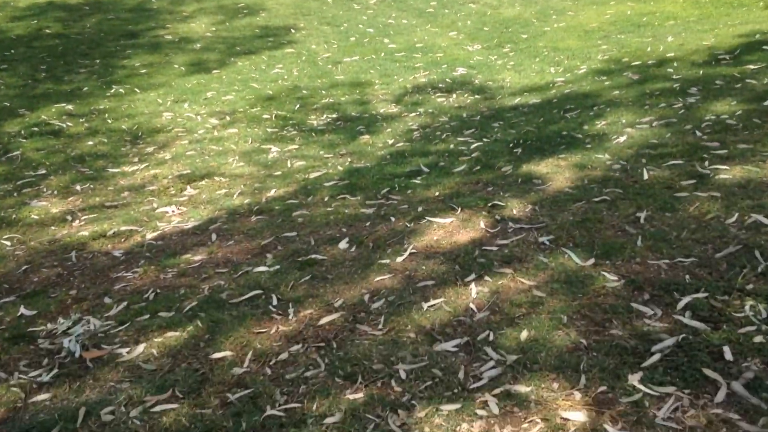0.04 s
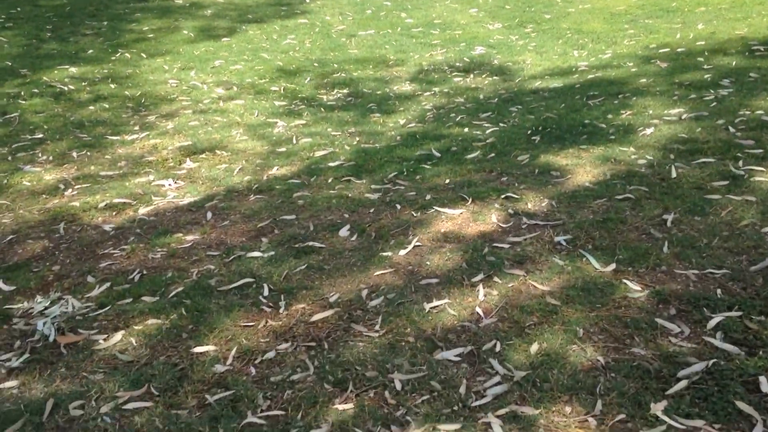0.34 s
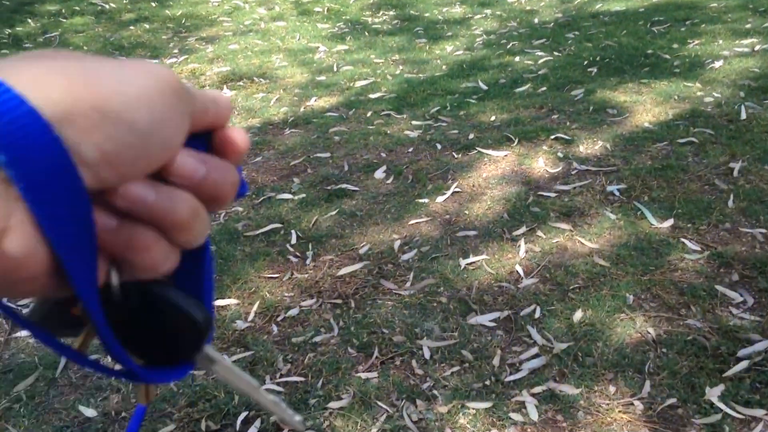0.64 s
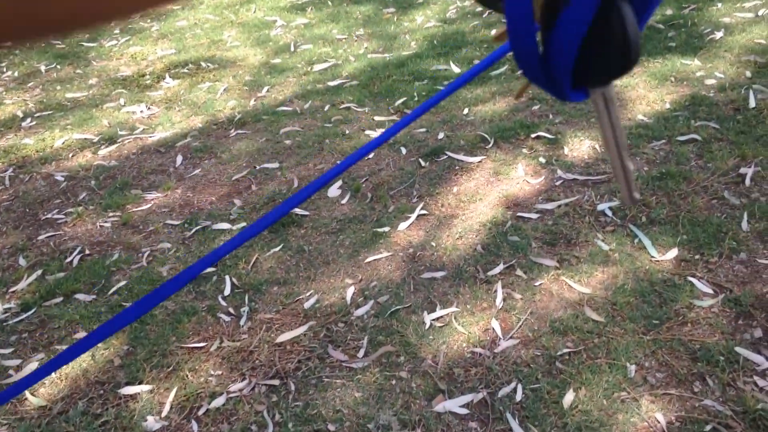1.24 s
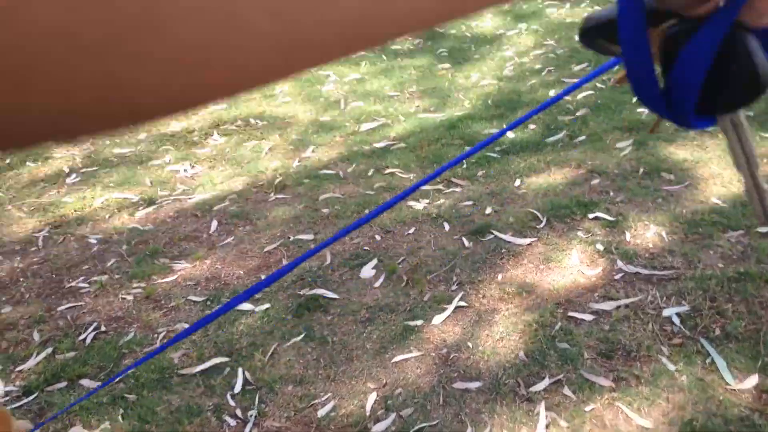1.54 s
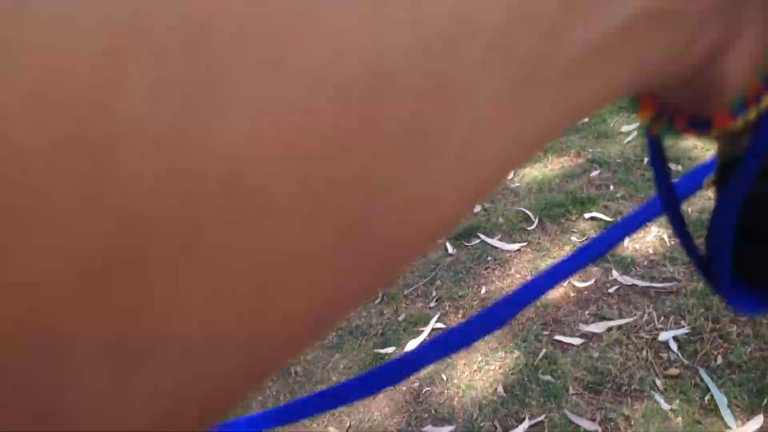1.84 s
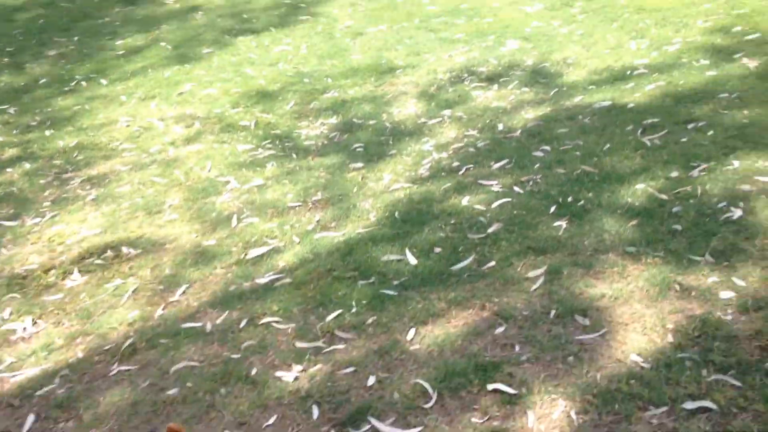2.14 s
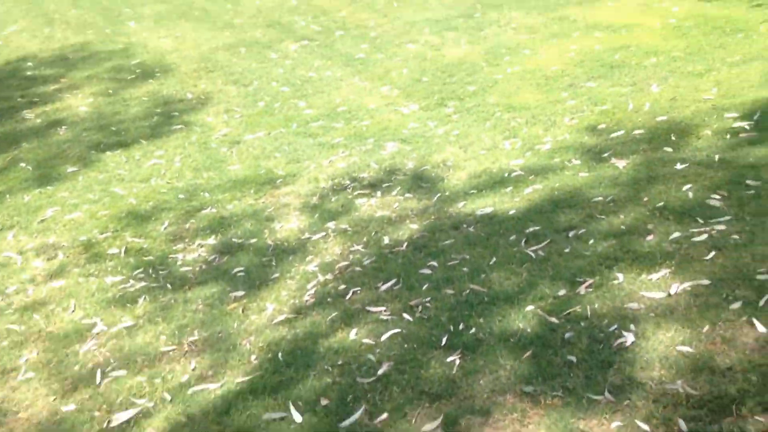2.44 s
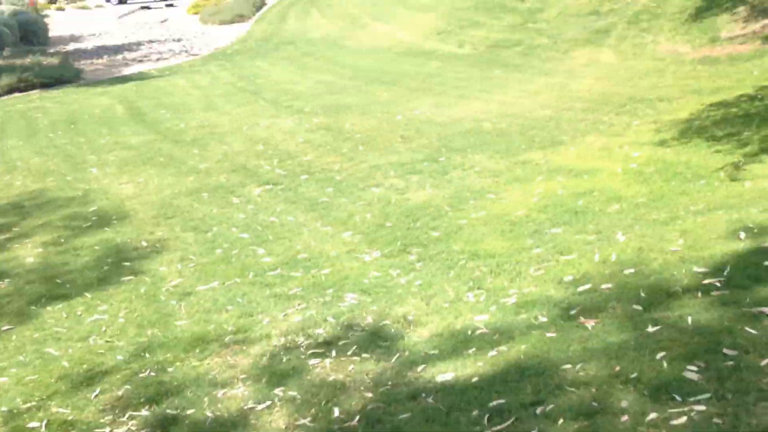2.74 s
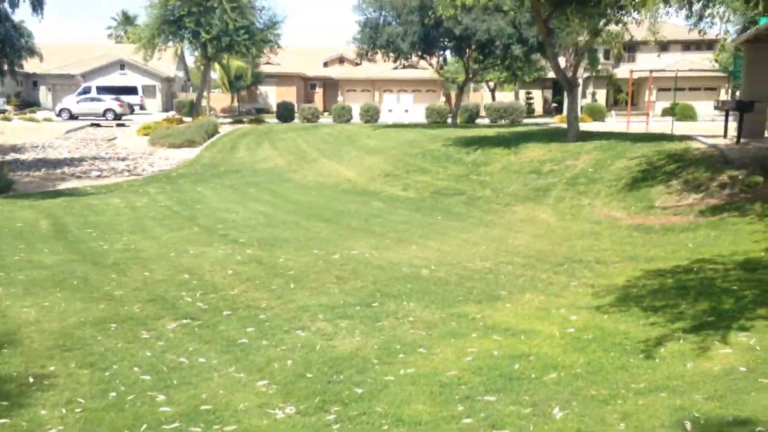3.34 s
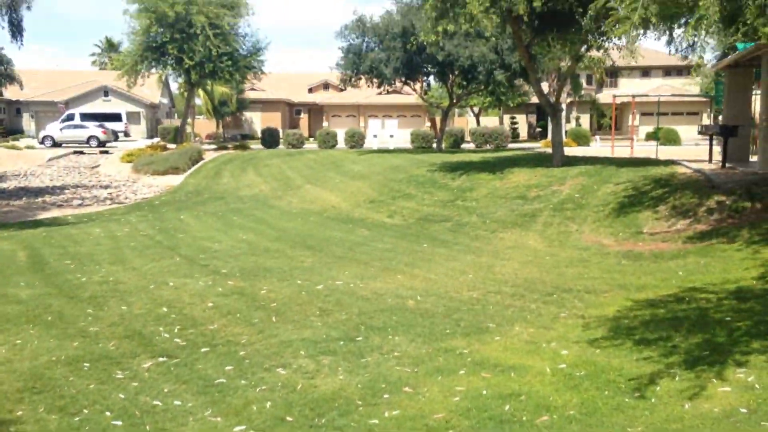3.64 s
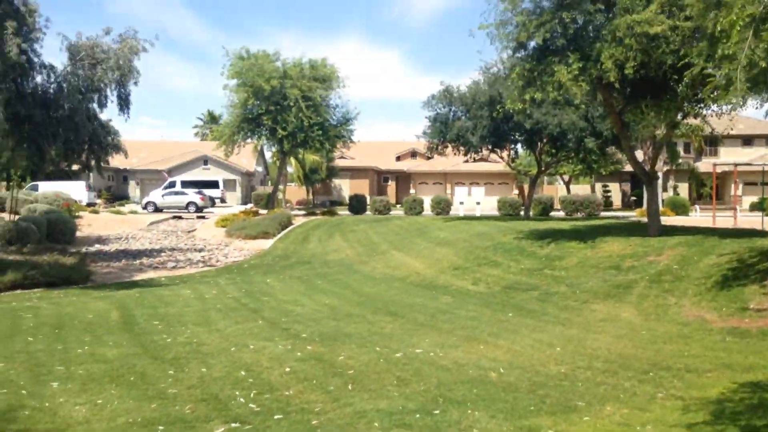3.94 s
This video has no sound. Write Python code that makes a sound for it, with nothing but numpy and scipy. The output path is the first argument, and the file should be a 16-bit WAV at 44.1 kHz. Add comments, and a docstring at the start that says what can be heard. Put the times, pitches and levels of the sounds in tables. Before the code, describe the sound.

Footsteps crunch over grass and dry leaves, with jingling keys and wind thumping the microphone.

```python
"""A walk over grass and dry leaves. From the start, steps crush the litter and snap leaves, a leash
hisses through the hand and wind thumps the microphone, over a quiet neighbourhood. From 0.8 s keys
dangling from the leash click and ring in earnest, loudest near 1.8 s; from 1.1 to 3 s a small bird
chirps far off. After 3 s keys and leash grow faint while the steps go on; a last gust comes near 4 s."""
import sys
import numpy as np
from scipy import signal
from scipy.fft import rfft, irfft
from scipy.io import wavfile
from scipy.ndimage import uniform_filter1d

SR = 44100
rng = np.random.default_rng(int(sys.argv[2]) if len(sys.argv) > 2 else 0)


def bounce(signal):
    """Save signal as a 16-bit WAV file at the path given by the first command-line argument."""
    frames = np.transpose(np.atleast_2d(signal))
    limited = np.clip(frames, -1, 1)
    pcm = np.round(limited * 32767).astype(np.int16)
    wavfile.write(sys.argv[1], SR, pcm)


N = 176400
T = np.arange(N) / SR


def undb(db):
    """Decibels to gain."""
    return 10 ** (np.asarray(db) / 20)


def colour(x, points):
    """Minimum-phase filter through (frequency [Hz], gain [dB]) points; output rms 1."""
    hz, db = np.array(points, float).T
    size = 2 * len(x)
    bins_hz = np.maximum(np.arange(len(x) + 1) * SR / size, 1)
    gain = undb(np.interp(np.log(bins_hz), np.log(hz), db))
    cepstrum = irfft(np.log(gain))
    cepstrum[1:len(x)] *= 2
    cepstrum[len(x) + 1:] = 0
    y = irfft(rfft(x, size) * np.exp(rfft(cepstrum)))[:len(x)]
    return y / y.std()


def resonate(x, hz, width):
    """Two-pole resonance; width is bandwidth over centre; output rms 1."""
    w = 2 * np.pi * min(hz, .45 * SR) / SR
    r = np.exp(-w * width / 2)
    y = signal.lfilter([1, -1], [1, -2 * r * np.cos(w), r * r], x)
    return y / y.std()


def noise(points):
    """Steady coloured noise, rms 1."""
    return colour(rng.standard_normal(N), points)


def drift(per_s):
    """Smooth random curve, standard deviation 1."""
    hold = int(SR / per_s)
    y = uniform_filter1d(rng.standard_normal(N)[np.arange(N) // hold], hold)
    return y / y.std()


def grains(per_s, scatter_db):
    """Random tiny fractures, most weak, a few strong."""
    size = np.minimum(rng.exponential(size=N), 3.5)
    return (rng.random(N) < per_s / SR) * rng.choice([-1, 1], N) * undb(scatter_db * size)


def creases():
    """Dry ticks from creases of many sizes, each ringing briefly at its own pitch."""
    pitches_hz = np.geomspace(2500, 14500, 9)
    return sum(resonate(grains(per_s=250, scatter_db=4.8), hz, width=.16)
               * np.sqrt(hz / pitches_hz.sum()) for hz in pitches_hz)


def swell(peak_s, rise_s, fall_s):
    """Envelope with a rounded rise and a longer-tailed release."""
    t = T - peak_s
    return np.exp(-np.where(t < 0, (t / rise_s) ** 2, (np.abs(t) / fall_s) ** 1.2))


def add(out, start_s, sound):
    """Mix in a short sound."""
    i = int(np.clip(start_s * SR, 0, N - 1))
    out[i:i + len(sound)] += sound[:N - i]


# ambient spectrum: (frequency [Hz], gain [dB])
AMBIENT_SPECTRUM = [(60, 9), (200, -22.5), (450, -6), (700, -8), (930, -9), (1400, -11.5), (2500, -19.5),
                    (4000, -21.5), (7000, -31), (15000, -64)]


def neighbourhood():
    """Faint, nearly steady outdoor wash."""
    return undb(-58.5 + .16 * drift(per_s=5.93)) * noise(AMBIENT_SPECTRUM)


# chirps: (start [s], length [s], pitch [Hz], level before echo [dB])
BIRD_CHIRPS = [(1.103, 0.093, 3430, -62), (1.216, 0.037, 4200, -61.5), (1.277, 0.033, 4380, -64),
               (1.815, 0.05, 3640, -61), (1.949, 0.07, 3330, -62), (2.531, 0.14, 4215, -65),
               (2.946, 0.042, 3490, -57)]


def bird():
    """Distant arched, wavering whistles, smeared by trees and walls."""
    arch_depth, waver_depth, echo_s = .05, .045, .04
    out = np.zeros(N)
    waver = 1 + waver_depth * drift(per_s=210)
    for start_s, length_s, hz, db in BIRD_CHIRPS:
        arch = np.sin(np.linspace(0, np.pi, int(length_s * SR)))
        pitch_hz = hz * (1 + arch_depth * (arch - .8))
        pitch_hz *= np.roll(waver, rng.integers(N))[:len(arch)]
        add(out, start_s, undb(db) * arch * np.sin(2 * np.pi * np.cumsum(pitch_hz) / SR))
    echo = rng.standard_normal(8192) * np.exp(-T[:8192] / echo_s)
    return signal.fftconvolve(out, echo / np.linalg.norm(echo))[:N]


# gusts: (peak time [s], rise [s], fall [s], level [dB])
WIND_GUSTS = [(.13, 0.16, 0.2, -33), (.385, 0.043, 0.062, -36), (0.68, 0.097, 0.062, -30.5),
              (.96, 0.036, 0.053, -41), (1.46, 0.089, 0.044, -43), (1.664, 0.051, 0.05, -40.5),
              (2.111, 0.064, 0.088, -33), (2.36, 0.053, 0.037, -39), (2.58, 0.044, 0.05, -41),
              (2.817, 0.029, 0.044, -28), (3.077, 0.024, 0.087, -39.5), (3.324, 0.021, 0.04, -30.5),
              (3.962, 0.059, 0.16, -35.5)]
# eddies: (time [s], envelope peak [dB], frequency [Hz])
WIND_EDDIES = [(0.138, -21, 121), (0.165, -27.5, 212), (.18, -24.5, 242), (0.214, -14.5, 335),
               (0.357, -15, 240), (0.362, -19.5, 304), (.499, -18.5, 157), (0.648, -13.5, 350),
               (.666, -11.5, 145), (0.698, -15.5, 260), (0.711, -24.5, 342), (0.723, -26, 222),
               (0.747, -19, 180), (.756, -13.5, 230), (1.469, -34.5, 160), (1.479, -26.5, 144),
               (1.641, -27, 153), (1.699, -31, 182), (2.085, -22, 144), (2.122, -25, 360),
               (2.174, -25, 130), (2.182, -25.5, 340), (2.232, -31.5, 249), (2.262, -37.5, 199),
               (2.327, -27, 148), (2.401, -26, 193), (2.805, -19, 162), (2.822, -19.5, 298),
               (2.851, -22.5, 130), (3.119, -28.5, 167), (3.263, -15, 149), (3.367, -20, 316),
               (3.884, -29.5, 117), (3.937, -24, 170), (3.952, -13.5, 178), (3.961, -13.5, 290)]
# wind spectra: (frequency [Hz], gain [dB])
BREEZE_SPECTRUM = [(20, -29), (45, -5.5), (75, 5), (120, -1), (200, -12.5), (400, -24.5), (1200, -48)]
GUST_SPECTRUM = [(20, -15), (40, 3), (70, 11.5), (120, 5.5), (200, -4), (350, -21.5), (600, -32.5),
                 (1200, -54), (3000, -109)]
WAKE_SPECTRUM = [(30, -19.5), (90, 4), (150, 4.5), (250, -4), (450, -13.5), (700, -29), (1200, -56),
                 (3000, -80)]


def wind():
    """Breeze rumbles, gusts swell, eddies hit the microphone as blunt pulses in ragged wakes."""
    wake_db, wake_s, eddy_cycles = -14, .011, .28
    gusts = sum(undb(db) * swell(at_s, rise_s, fall_s) for at_s, rise_s, fall_s, db in WIND_GUSTS)
    wakes = sum(undb(db + wake_db) * swell(at_s, wake_s, wake_s) for at_s, db, _ in WIND_EDDIES)
    out = gusts * noise(GUST_SPECTRUM) + wakes * noise(WAKE_SPECTRUM)
    out += undb(-54 + 3 * drift(per_s=14)) * noise(BREEZE_SPECTRUM)
    lead_s = 1024 / SR
    t = T[:2048] - lead_s
    for at_s, db, hz in WIND_EDDIES:
        phase = 2 * np.pi * hz * t + rng.standard_normal()
        pulse = np.cos(phase) / np.cosh(hz * t / eddy_cycles) ** 1.21
        add(out, at_s - lead_s, undb(db) * pulse)
    return out


# slide envelope: (time [s], relative level [dB])
SLIDE_LEVELS = [(0, -45), (.1, -51.5), (.25, -52), (.35, -58.5), (.48, -44), (.53, -57), (.68, -55),
                (.73, -49.5), (.84, -52.5), (1.0, -51.5), (1.1, -52), (1.48, -61.5), (1.62, -51),
                (1.85, -52), (2.0, -56), (2.28, -53), (2.42, -64.5), (2.48, -55.5), (2.65, -59.5),
                (2.85, -56.5), (3.02, -60), (4, -67.5)]
# friction spectrum: (frequency [Hz], gain [dB])
SLIDE_SPECTRUM = [(1000, 5.5), (2500, -3), (5000, -4.5), (8000, -5), (11000, -6.5), (14000, -4.5),
                  (16000, 1)]


def leash():
    """Webbing and sleeve slide with a gritty hiss and tiny crackles."""
    trim_db, flutter_db, crackle_db = -5, 2.5, -5
    times_s, levels_db = np.array(SLIDE_LEVELS).T
    hiss = colour(grains(per_s=7000, scatter_db=2.5), SLIDE_SPECTRUM)
    crackle = colour(creases(), SLIDE_SPECTRUM)
    level_db = np.interp(T, times_s, levels_db) + trim_db + flutter_db * drift(per_s=60)
    return undb(level_db) * (hiss + undb(crackle_db) * crackle)


# key and clasp knocks: (time [s], relative click level [dB], click centre [Hz],
#   relative ring level [dB], lean to the higher key [dB], share ringing freely [0..1])
KEY_KNOCKS = [(0.017, -38, 9200, -52, 17, 0.3), (0.12, -33, 13500, -42, 13, 0.15),
              (0.848, -18, 15200, -52, -10, .2), (1.036, -30.5, 8900, -39, 14, 0.5),
              (1.068, -26, 12000, -60, 8, 0.32), (1.094, -23.5, 8100, -33, -2, 0.32),
              (1.113, -31, 8900, -35, -6, 0.17), (1.167, -26, 12000, -36, 10, 0.25),
              (1.264, -28, 9200, -47, -5, 0.12), (1.28, -28, 13500, -43, 2, 0.16),
              (1.4, -19, 12500, -58, 7, 0.13), (1.739, -31, 11000, -52, -4, 0.8),
              (1.771, -21, 9000, -39, 6, .2), (1.775, -16.5, 9600, -21.5, 8, 0.22),
              (1.781, -21, 11000, -34, -5, 0.17), (2.05, -22.5, 6940, -40.5, -5, 0.16),
              (2.097, -25.5, 8900, -49, 11, 0.16), (2.202, -18.5, 8700, -36.5, -3, 0.12),
              (2.211, -31, 11500, -54, 0, .1), (2.222, -39, 11500, -49, 2, .1),
              (2.323, -25, 7940, -35.5, -9, 0.22), (2.371, -31, 12000, -54, 0, 0.1),
              (2.457, -31, 11000, -57, 0, .2), (2.467, -33.5, 9000, -42.5, -8, 0.63),
              (2.565, -25, 14000, -67, 5, 0.17), (2.595, -39, 9000, -41.5, -17, 0.2),
              (2.731, -52, 9100, -48, -12, 1), (2.798, -23, 9200, -48, 9, 0.98),
              (2.939, -25, 12000, -57, 11, 0.27), (2.974, -30.5, 12000, -49, 12, 0.11),
              (3.424, -31.5, 11000, -58, 14, 0.5), (3.463, -47, 12000, -47.5, -4, 1),
              (3.481, -35, 8900, -54, 10, 1), (3.522, -50, 11000, -54.5, 4, .7),
              (3.6, -49, 12000, -46, 12, 0.9), (3.617, -45, 12000, -43.5, 15, 0.16),
              (3.724, -47, 11000, -56.5, 5, .5), (3.741, -35, 11500, -56, 8, .3),
              (3.875, -44, 11000, -53, 10, 0.46), (3.908, -34.5, 11000, -52, 7, 0.46),
              (3.977, -50, 10900, -57, 5, 0.61)]
# modes: (frequency [Hz], weight [dB], t60 [s], key [-1 lower, +1 higher])
RING_MODES = [(5200, -20, .03, -1), (7300, -19, .04, -1), (8170, -15, .09, 1), (9960, -4, .075, -1),
              (10090, -6, .06, -1), (10400, -13, .03, -1), (11385, 0, .09, 1), (11560, -5, .07, 1),
              (11780, -12, .05, 1), (12200, -15, .04, 1), (14690, -10, .07, 1)]
# contact spectrum: (frequency [Hz], gain [dB])
CLICK_SPECTRUM = [(1500, -2), (3500, -3.5), (5500, -7), (8000, -9.5), (11500, -13), (15000, -11.5),
                  (16500, 5.5)]


def keys():
    """Each knock clicks and rings the modes of two keys; the bunch damps, rattles and rebounds."""
    scatter_db, detune, damping_s, ring_trim_db = 3, .002, .014, -2.5
    click_s, chatter_db, chatter_s, click_trim_db = .0027, -17, .0033, -7
    rebounds_per_s, rebound_db, rebound_s = 220, -12, .014
    out, t = np.zeros(N), T[:8192]
    hz, mode_db, t60_s, key = np.array(RING_MODES).T[:, :, None]
    contact = noise(CLICK_SPECTRUM)
    rattle = undb(3 * drift(per_s=230))
    for at_s, click_db, click_hz, ring_db, lean_db, free in KEY_KNOCKS:
        strength, mistune, phase = rng.standard_normal((3, len(hz), 1))
        weights = undb(mode_db + scatter_db * strength + key * lean_db / 2)
        modes = np.sin(2 * np.pi * (hz * (1 + detune * mistune) * t + phase))
        ring = (weights * undb(-60 * t / t60_s) * modes).sum(axis=0) / np.linalg.norm(weights)
        ring *= free + (1 - free) * np.exp(-t / damping_s)
        click = resonate(np.roll(contact, rng.integers(N))[:len(t)], click_hz, width=.78)
        click *= np.exp(-t / click_s) + undb(chatter_db) * np.exp(-t / chatter_s)
        hits = (rng.random(len(t)) < rebounds_per_s / SR) * undb(rebound_db) * np.exp(-t / rebound_s)
        hits[0] = 1  # first strike
        jangle = signal.fftconvolve(ring, hits)[:len(t)] * np.roll(rattle, rng.integers(N))[:len(t)]
        jangle *= np.linalg.norm(ring) / np.linalg.norm(jangle)
        add(out, at_s, undb(ring_db + ring_trim_db) * jangle)
        add(out, at_s, undb(click_db + click_trim_db) * signal.fftconvolve(click, hits))
    return out


# leaf and stalk snaps, plus the dull click of a wind buffet near 0.7 s:
#   (time [s], body peak [dB], body centre [Hz], edge peak [dB])
SNAPS_AND_BUFFET = [(0.125, -37, 1670, -45), (0.229, -37.5, 1040, -48), (0.331, -50, 1400, -33.5),
                    (.375, -59, 1400, -37.5), (0.394, -30.5, 1290, -45), (.429, -52, 1500, -35),
                    (0.463, -30.5, 1240, -36), (.493, -35.5, 4030, -49), (.581, -38, 2500, -44),
                    (.695, -28.5, 544, -58), (.871, -31.5, 1340, -54), (0.924, -32.5, 880, -50),
                    (.941, -30.5, 1170, -36), (0.98, -22, 1110, -42), (0.988, -39, 1220, -46),
                    (1.037, -33, 990, -42), (1.578, -36, 4500, -39), (1.603, -28.5, 1230, -33),
                    (1.628, -52, 5500, -36), (1.637, -42, 1270, -40), (1.659, -37, 1350, -54),
                    (1.67, -40, 7150, -39), (1.684, -43, 5360, -34), (1.761, -38, 5500, -39),
                    (2.073, -37, 2020, -35), (2.1, -31.5, 1730, -39), (2.123, -39, 3030, -53),
                    (2.1447, -28, 2130, -40), (2.157, -36, 1500, -34), (2.17, -34, 5500, -29),
                    (2.205, -28, 4800, -27), (2.655, -43, 2700, -46), (2.687, -39, 4670, -40),
                    (2.775, -38.5, 1440, -40), (3.155, -31, 3420, -38), (3.185, -30.5, 3350, -51),
                    (3.2, -30.5, 3360, -49), (3.216, -36, 2900, -48), (3.277, -41.5, 3320, -54),
                    (3.327, -30, 1730, -50), (3.349, -34.5, 4400, -34.5), (3.389, -41.5, 1560, -54),
                    (3.405, -42, 1610, -54), (3.485, -39.5, 1530, -40), (3.587, -46, 3180, -65)]


def snaps_and_buffet():
    """Leaves and stalks snap, one wind buffet clicks: each a short resonant burst with a bright edge."""
    body_decay_s, edge_decay_s = .00092, .0011
    out, t = np.zeros(N), T[:2048]
    for at_s, body_db, hz, edge_db in SNAPS_AND_BUFFET:
        body_noise, edge_noise = rng.standard_normal((2, len(t)))
        body = resonate(body_noise * np.exp(-t / body_decay_s), hz, width=.74)
        body = signal.lfilter(*signal.butter(2, 1.01 * hz, "low", fs=SR), body)
        edge = resonate(edge_noise * np.exp(-t / edge_decay_s), hz=9400, width=1)
        add(out, at_s, undb(body_db) * body / np.abs(body).max())
        add(out, at_s, undb(edge_db) * edge / np.abs(edge).max())
    return out


# steps and scuffs: (peak time [s], rise [s], fall [s], relative crunch level [dB],
#   crunch centre [Hz], relative crisp level [dB], crisp centre [Hz])
FOOTFALLS = [(0.02, 0.019, 0.0093, -42, 1440, -36.5, 9100), (.125, 0.0066, 0.006, -37, 1360, -33, 13000),
             (0.289, 0.011, 0.022, -33.5, 1160, -40, 13200), (0.336, 0.013, 0.032, -41, 1190, -40.5, 13200),
             (.455, 0.074, 0.056, -49, 1190, -44.5, 12800), (0.811, 0.02, 0.05, -47, 1180, -47, 12000),
             (0.976, 0.064, 0.04, -39, 1010, -52, 3030), (1.583, 0.026, 0.032, -43.5, 1320, -40.5, 6000),
             (1.645, 0.036, 0.025, -38.5, 1350, -49, 8000), (2.172, 0.042, 0.033, -40, 1690, -41.5, 6640),
             (2.756, 0.041, 0.038, -47, 1260, -47, 3140), (3.205, 0.047, 0.04, -55, 1890, -44.5, 3400),
             (3.303, 0.026, 0.017, -48, 1560, -50.5, 3500),
             (3.327, 0.0047, 0.028, -35.5, 1640, -43.5, 4460),
             (3.352, 0.0046, 0.0046, -37.5, 1630, -44, 9000), (3.855, 0.05, 0.067, -51.5, 1260, -55, 3020)]
# litter spectra: (frequency [Hz], gain [dB])
CRUNCH_SPECTRUM = [(200, -14), (600, 10), (1000, 7.5), (1600, 7), (2400, -1.5), (4000, 2.5), (16000, 2.5)]
CRISP_SPECTRUM = [(500, -15), (2000, 12.5), (3500, 3.5), (5500, 1.5), (8000, 3), (11000, 1), (14500, 8),
                  (16000, 6)]


def footsteps():
    """Each foot presses a shower of fractures from the litter: hollow crunch, crisp leaf edges."""
    fractures_per_s, uneven_db, trim_db = 2200, 2.2, -8.5
    out = np.zeros(N)
    crunch = colour(grains(fractures_per_s, scatter_db=2.6), CRUNCH_SPECTRUM)
    crisp = colour(grains(fractures_per_s, scatter_db=2.4), CRISP_SPECTRUM)
    crisp += colour(creases(), CRISP_SPECTRUM)
    for at_s, rise_s, fall_s, crunch_db, crunch_hz, crisp_db, crisp_hz in FOOTFALLS:
        low = undb(crunch_db) * resonate(crunch, crunch_hz, width=.41)
        high = undb(crisp_db) * resonate(crisp, crisp_hz, width=.66)
        out += swell(at_s, rise_s, fall_s) * (low + high)
    return out * undb(uneven_db * drift(per_s=180) + trim_db)


def scene():
    """Mono mix in open air."""
    background = neighbourhood()
    return (footsteps() + snaps_and_buffet() + keys() + leash() + wind() + bird() + background)[None]


def record(dry):
    """The camera cuts the deepest rumble and the top of the treble."""
    low_hz, top_hz = 25, 15280
    dry = signal.sosfilt(signal.butter(1, low_hz, "high", fs=SR, output="sos"), dry)
    return signal.sosfilt(signal.ellip(10, .2, 70, top_hz, fs=SR, output="sos"), dry)


dry = scene()
out = record(dry)
bounce(out)
```